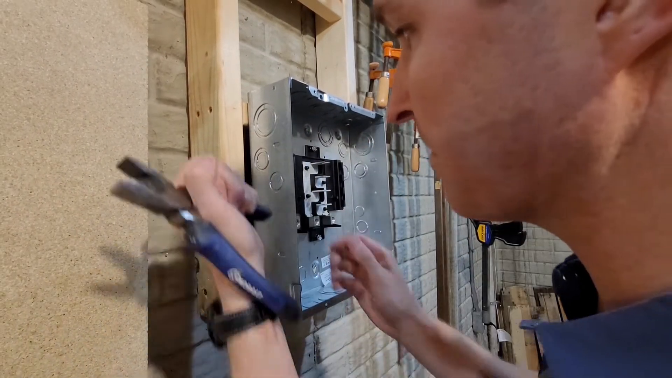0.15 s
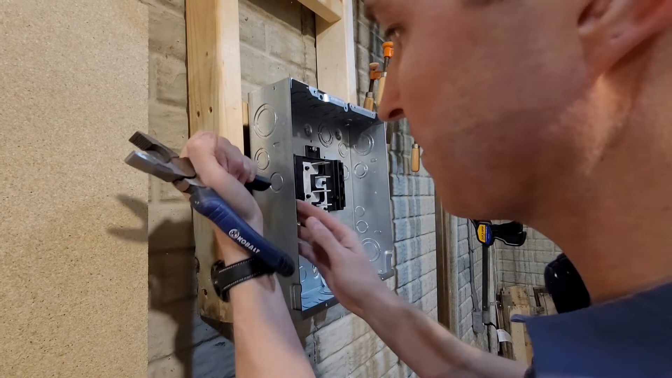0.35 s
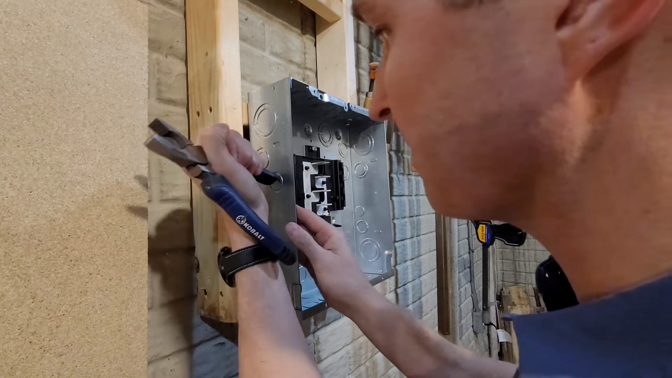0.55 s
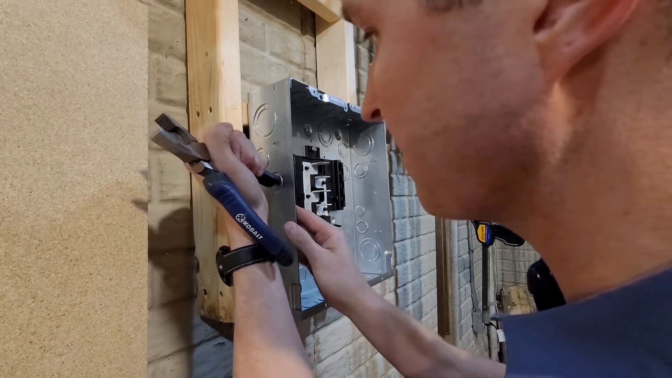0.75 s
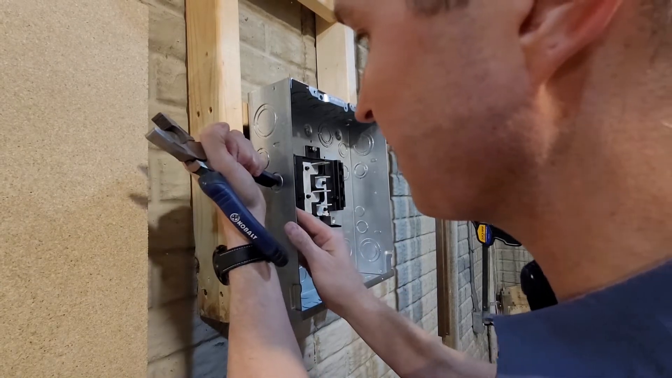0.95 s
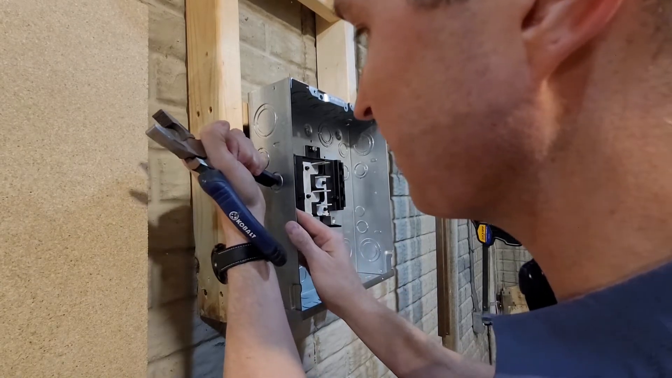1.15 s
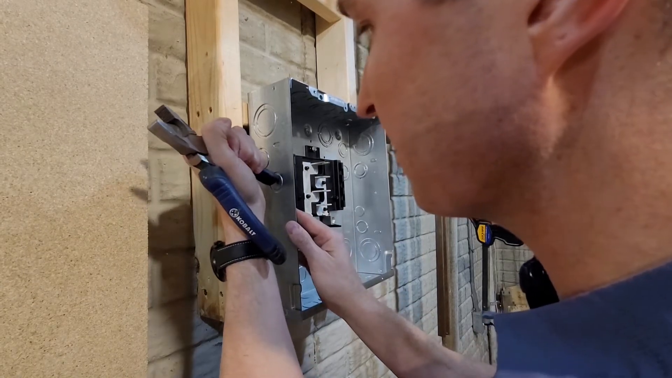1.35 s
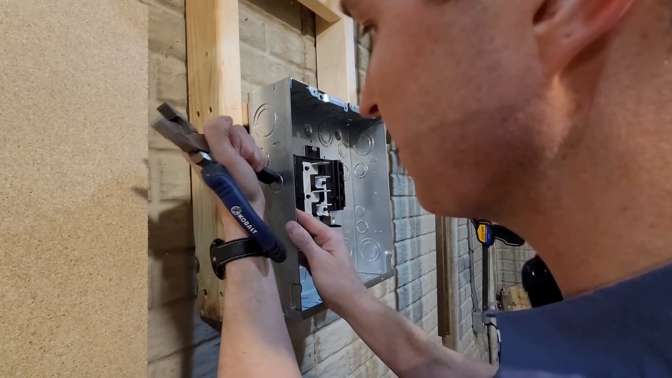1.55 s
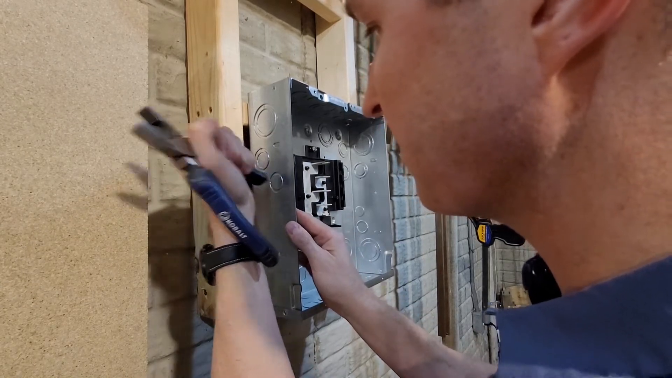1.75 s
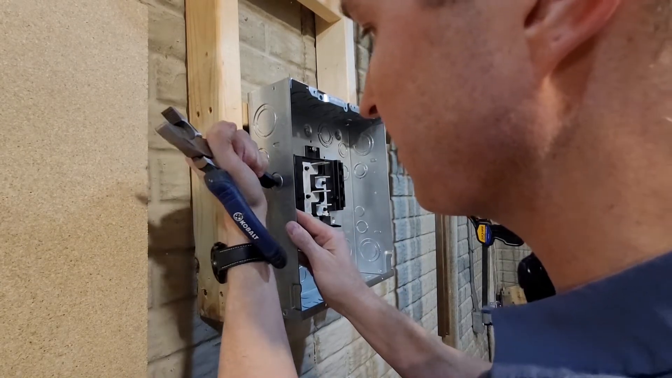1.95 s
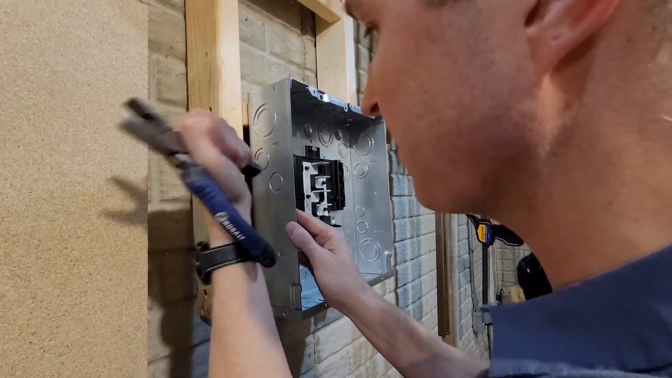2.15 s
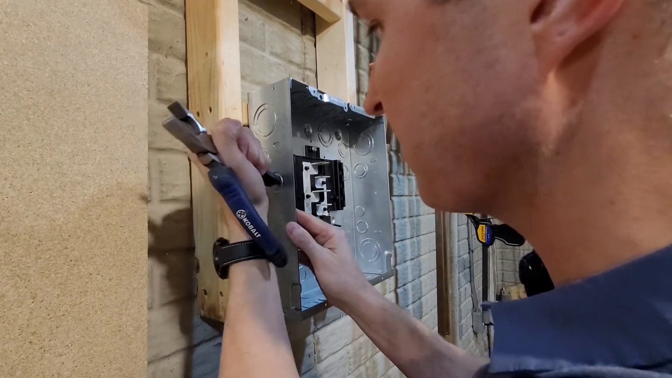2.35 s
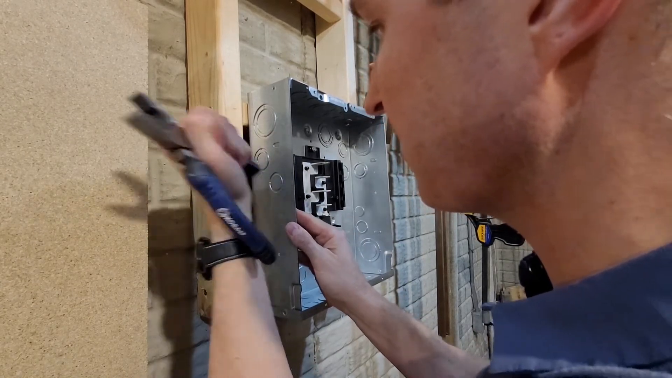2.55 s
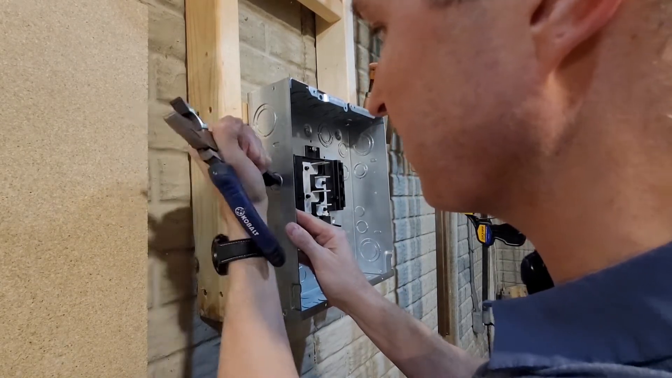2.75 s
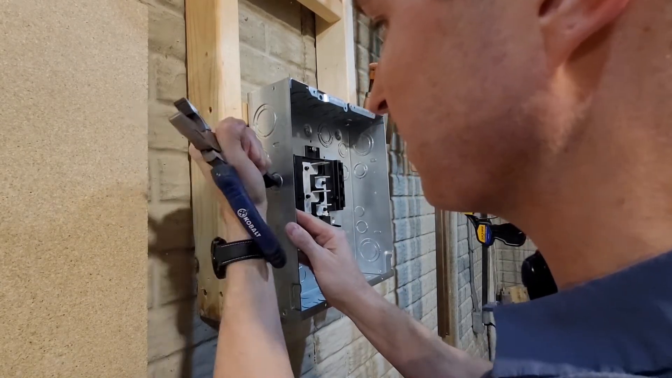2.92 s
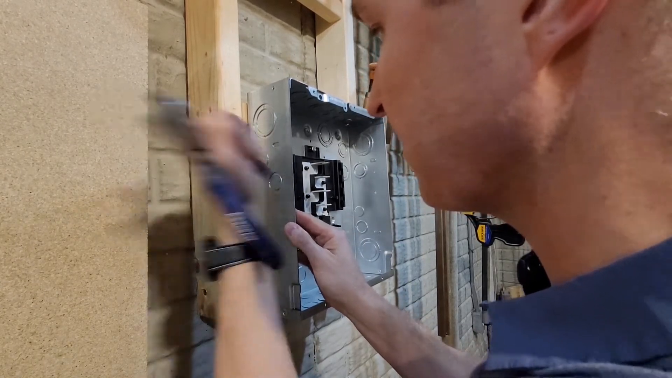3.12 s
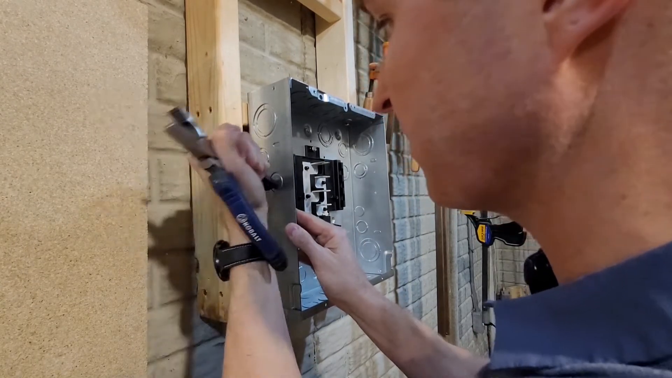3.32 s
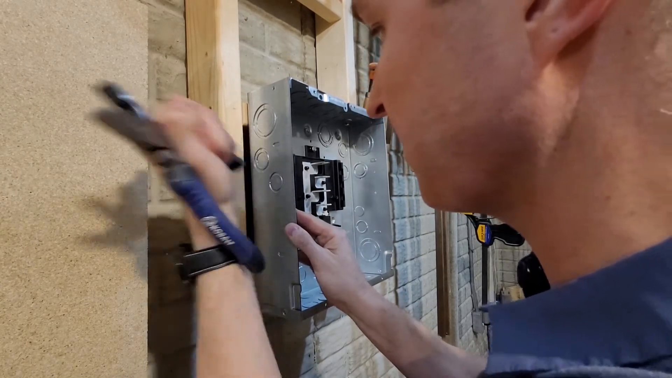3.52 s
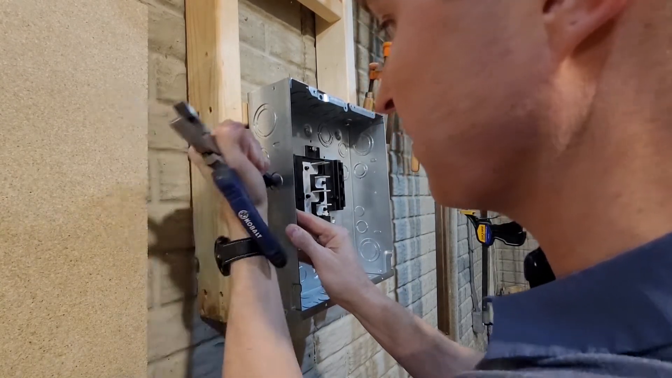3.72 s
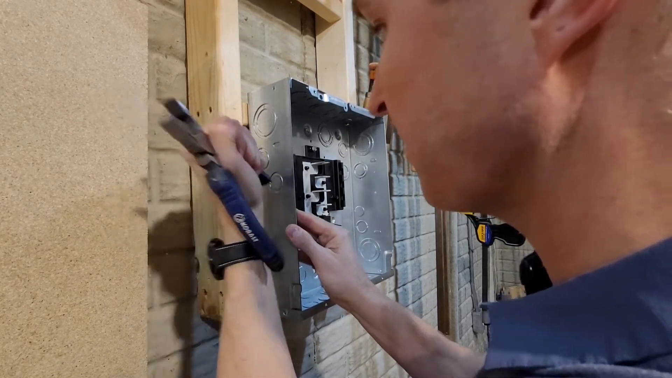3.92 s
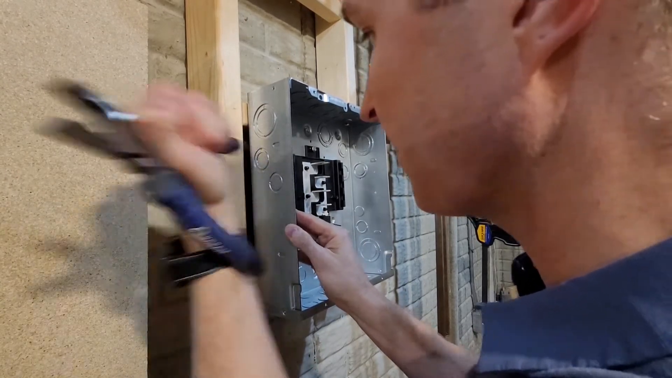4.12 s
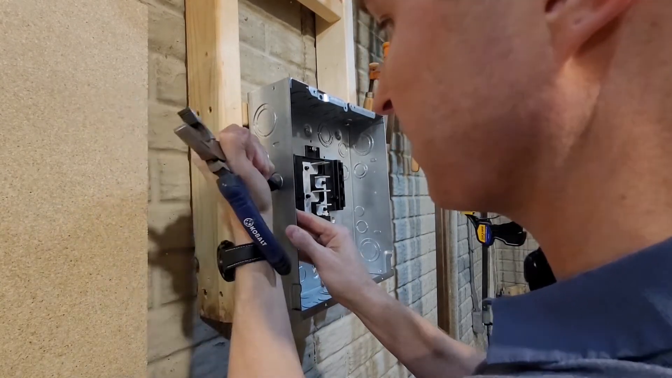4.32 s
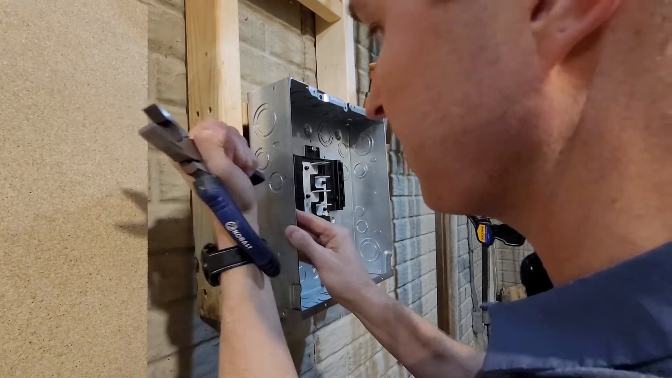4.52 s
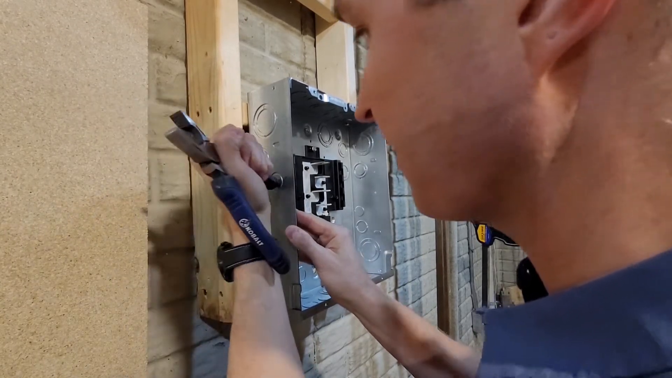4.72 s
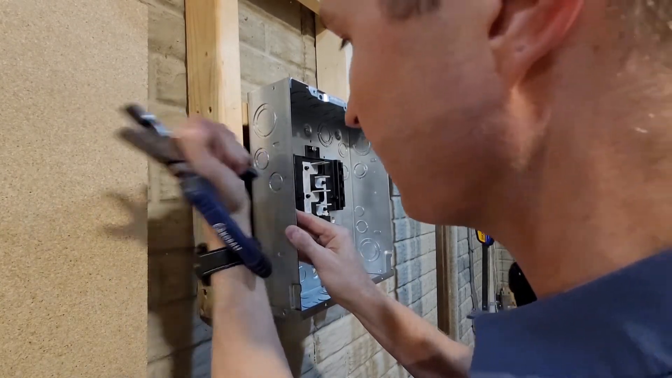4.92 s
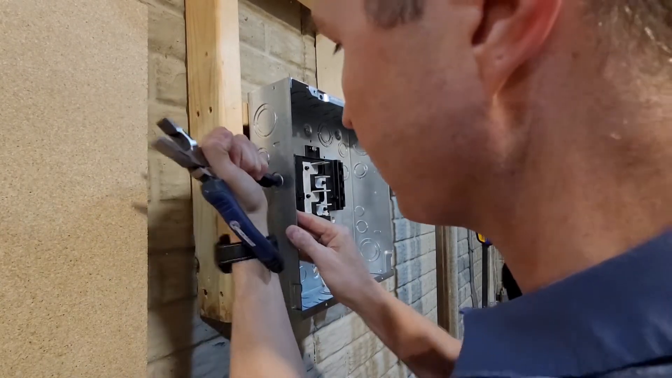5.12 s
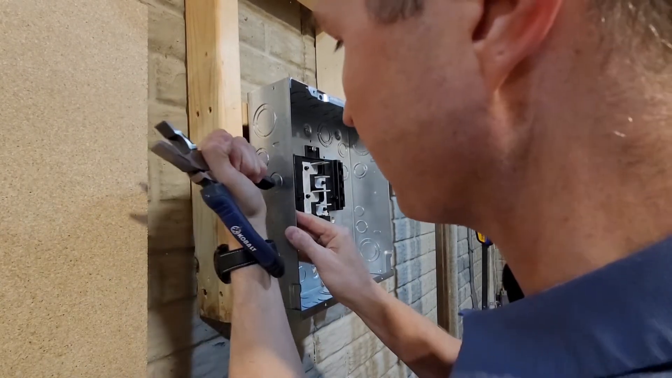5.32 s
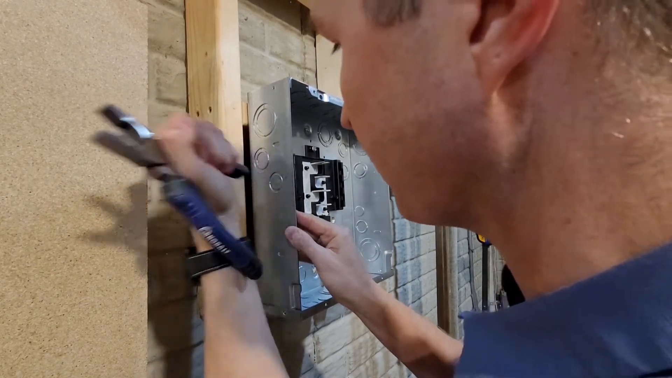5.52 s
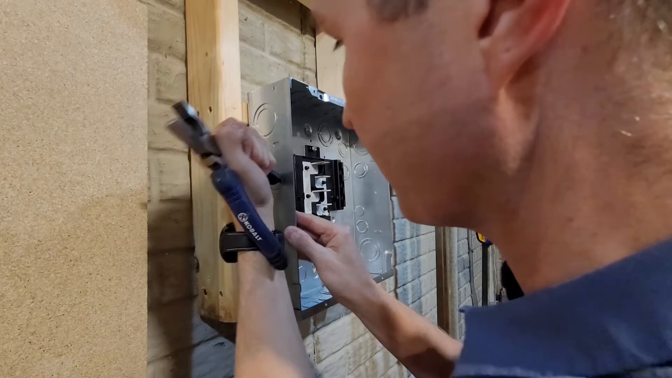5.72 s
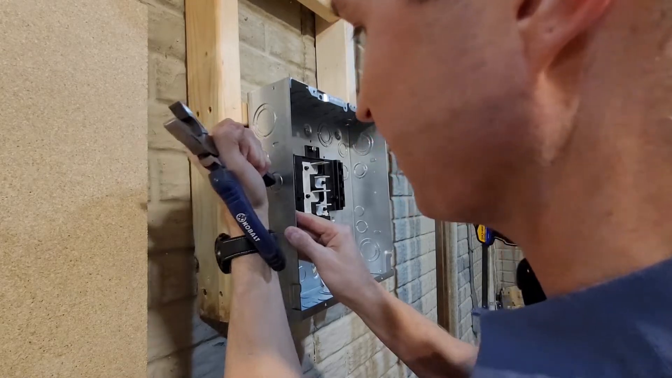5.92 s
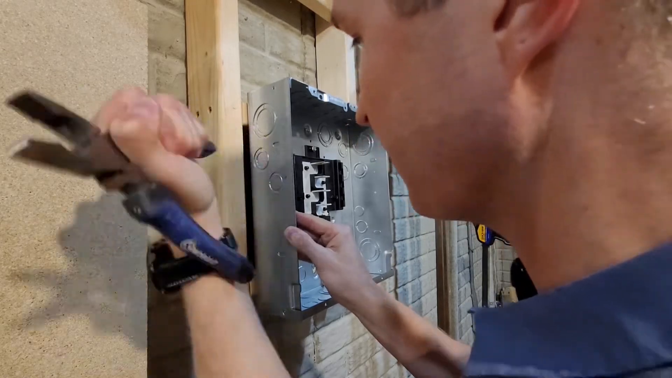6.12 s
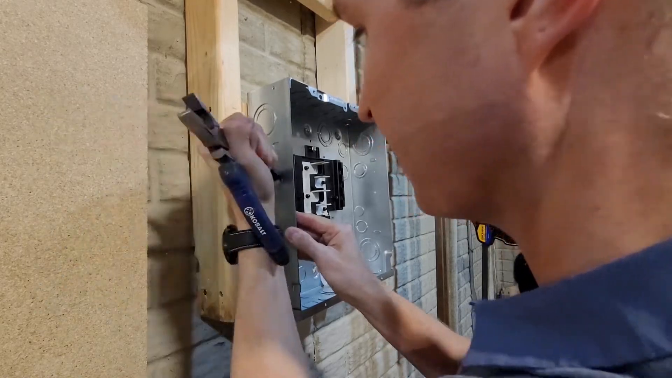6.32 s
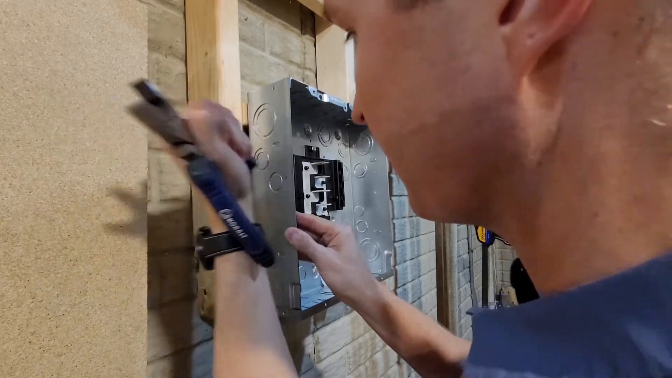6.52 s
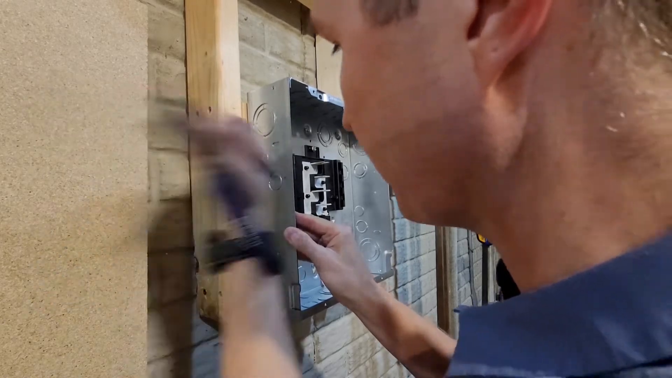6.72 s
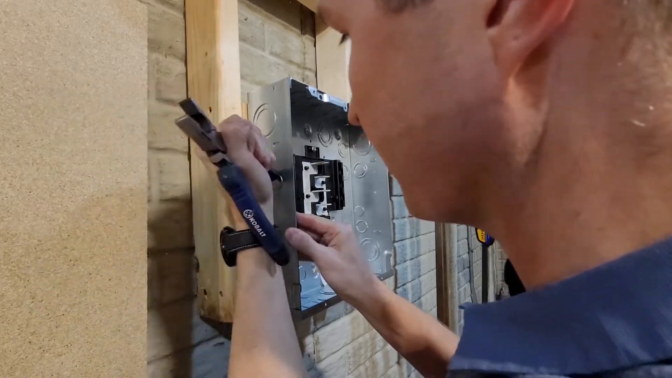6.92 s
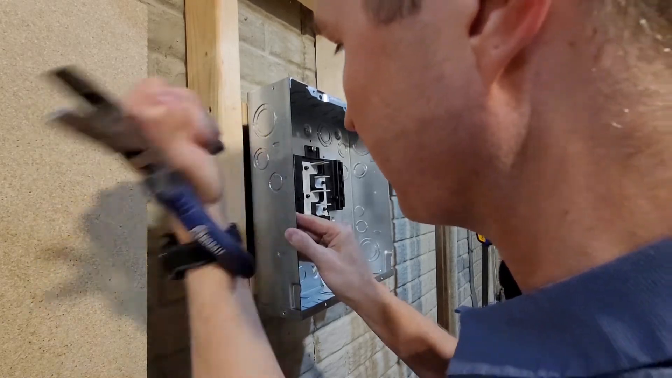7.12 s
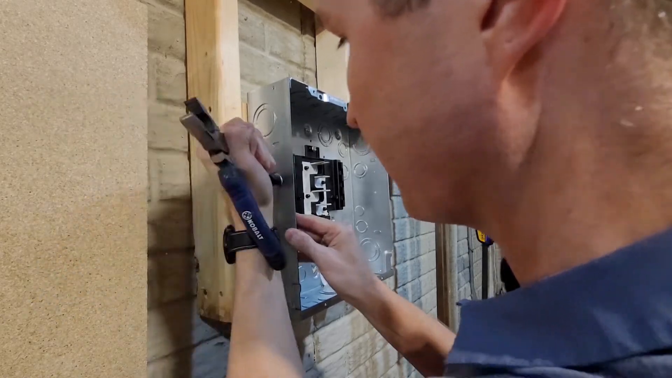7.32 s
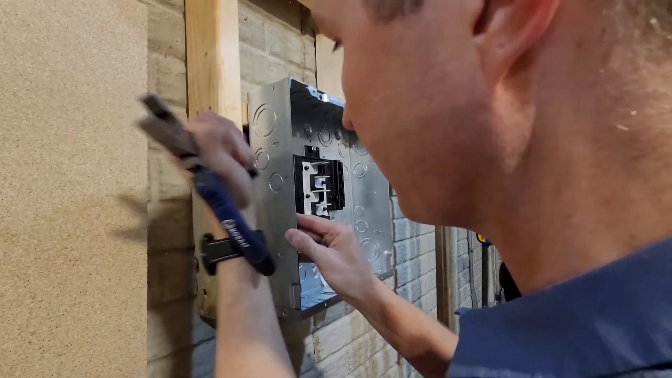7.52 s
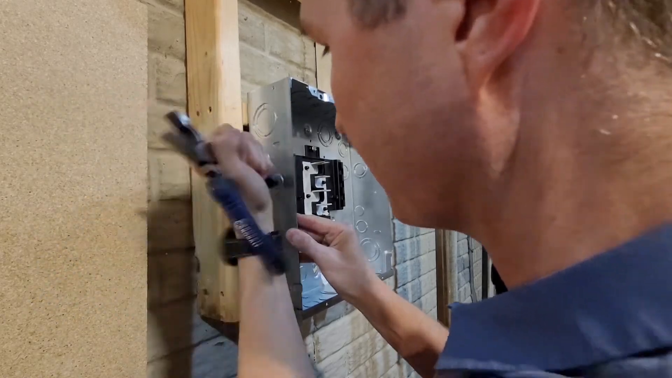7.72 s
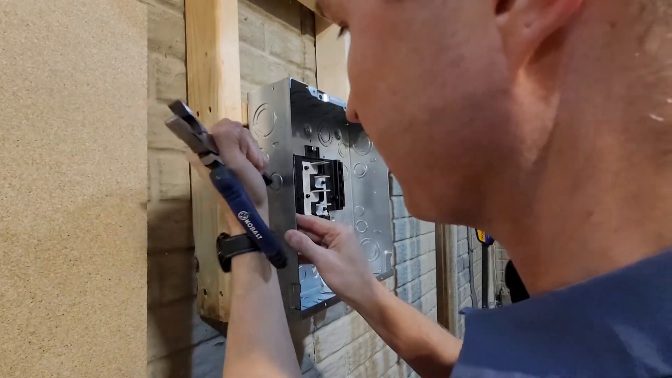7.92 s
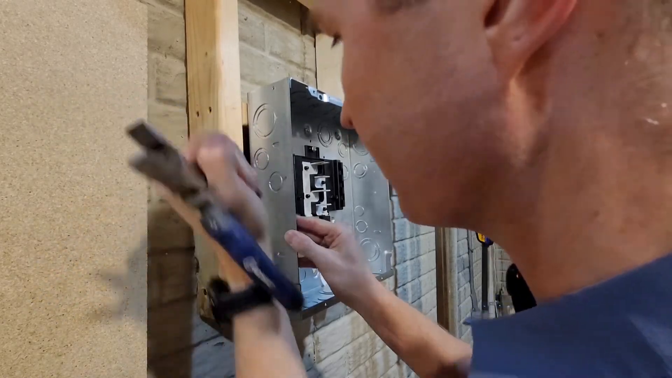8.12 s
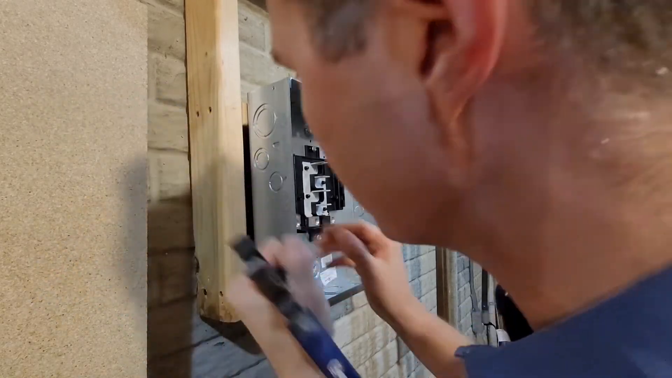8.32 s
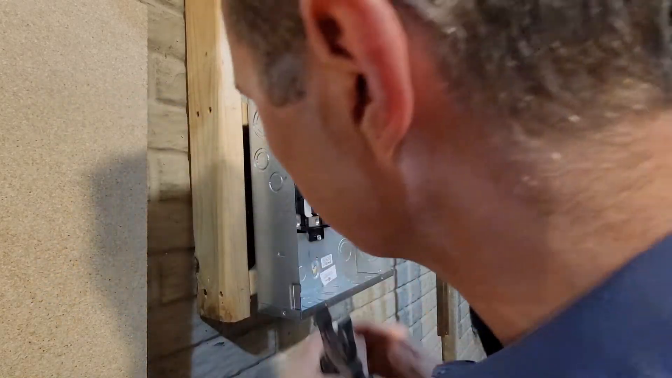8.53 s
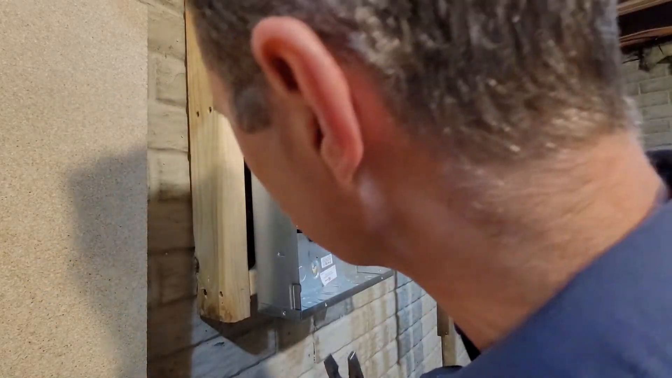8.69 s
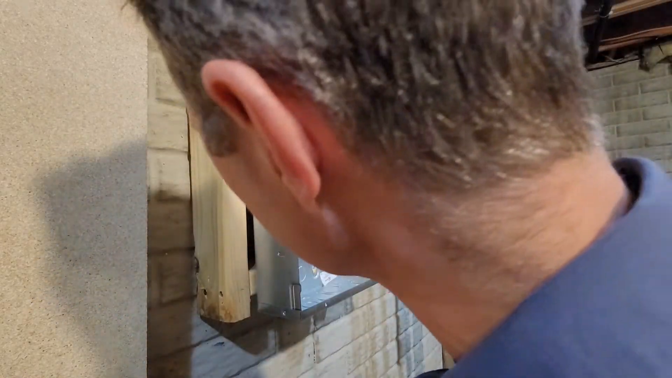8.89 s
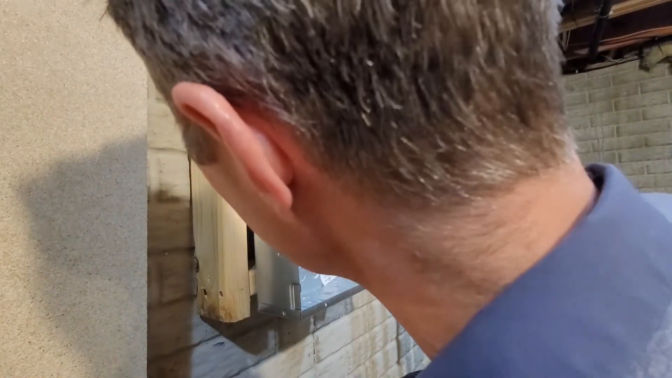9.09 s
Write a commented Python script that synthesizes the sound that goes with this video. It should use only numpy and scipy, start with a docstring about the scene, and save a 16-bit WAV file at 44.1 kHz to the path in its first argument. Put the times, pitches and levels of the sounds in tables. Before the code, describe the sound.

A close, stereo indoor scene in a basement with a quiet, steady low rumble. From 0 to 2 s a sleeve rustles, with small grip ticks and scuffs; a barely audible tap falls at 0.5 s, a dull soft one at 0.65, and two more at 1.6 and 1.7. Hard blows of pliers on a steel electrical box begin at 1.9 s, then 2.3, 2.7, 3.2, 3.7 and 4.2: a sharp crack, damped clank, dense steel clatter and hollow box ring, dying within about a third of a second over a faint framing boom. A weak dull tap comes at 4.8. Brighter hard blows follow at 5.1, 5.7, 6.2, 6.8, 7.3 and 7.7, loud enough to squash the peaks. A faint bright hiss grows from about 7 s. After the last ring fades, clothing rustles around 8.3 to 9.4 s, leaving rumble and hiss.

```python
"""The side of a pair of pliers hammers on the knockout of a steel electrical box screwed to a stud in a basement.
Five light taps and twelve hard blows: damped wall partials, crack, dense steel clatter, box modes, echoes, boom.
Shaped noise makes the sleeve rustle, grip ticks and scuffs around the blows.
Below lies a steady low noise rumble; a bright noise hiss swells near the end."""
import sys
import numpy as np
from scipy import signal
from scipy.fft import rfft, irfft, next_fast_len
from scipy.io import wavfile
from scipy.ndimage import uniform_filter1d, minimum_filter1d, map_coordinates

SR = 44100
rng = np.random.default_rng(int(sys.argv[2]) if len(sys.argv) > 2 else 0)


def wav_record(signal):
    """Record a signal, one row per channel, as 16-bit PCM in the file named by sys.argv[1]."""
    frames = np.transpose(np.atleast_2d(signal))
    bounded = np.clip(frames, -1, 1)
    # unit amplitude maps onto the largest positive 16-bit level
    quanta = np.round(bounded * 32767).astype(np.int16)
    wavfile.write(sys.argv[1], SR, quanta)


N = 408132
TIME_S = np.arange(N) / SR
RING_S = np.arange(SR) / SR  # time since a blow


def amp(db):
    """Decibels to gain."""
    return 10 ** (np.asarray(db) / 20)


def unit(x):
    """Scale to rms 1."""
    return x / np.sqrt(np.mean(x ** 2) + 1e-20)


def along(points, hz):
    """Interpolate (frequency, value) points on a log-frequency axis."""
    point_hz, value = np.transpose(points)
    return np.interp(np.log(hz + 1), np.log(point_hz + 1), value)


def wobble(knots_per_s):
    """Smooth random curve through normally distributed knots."""
    knots = rng.standard_normal(int(N * knots_per_s / SR) + 4)
    return map_coordinates(knots, [np.arange(N) * knots_per_s / SR])


def filtered(x, response):
    """Apply a gain given as a function of frequency."""
    size = x.shape[-1]
    padded = next_fast_len(size + 4096)
    spectrum = rfft(x, padded) * response(np.fft.rfftfreq(padded, 1 / SR))
    return irfft(spectrum, padded)[..., :size]


# Stereo width: (frequency [Hz], side re mid [dB])
SIDE_TO_MID = [(60, -16), (130, -14.5), (260, -6.5), (500, 2.5), (12000, -0.5)]


def noise(spectrum, size):
    """Stereo noise of rms 1: alike in the bass, nearly unrelated in the treble."""
    def mid_side_gain(hz):
        return amp(along(spectrum, hz)) * amp([0 * hz, along(SIDE_TO_MID, hz)])

    mid, side = filtered(rng.standard_normal((2, size)), mid_side_gain)
    return unit(np.array([mid + side, mid - side]))


def add(track, start_s, sound):
    """Mix a sound into the track in place."""
    part = track[:, max(round(start_s * SR), 0):][:, :sound.shape[-1]]
    part += sound[:, :part.shape[-1]]


def swell(t, rise_s, t60_s):
    """Exponential build-up times exponential decay."""
    return (1 - np.exp(-t / rise_s)) * amp(-60 * t / t60_s)


# Room rumble spectrum: (frequency [Hz], relative density [dB per Hz])
RUMBLE_SPECTRUM = [(20, -28.5), (45, -22), (75, 0.5), (110, -17), (160, -19.5), (230, -15), (500, -20),
                   (1000, -27.5), (5000, -35), (9000, -46), (16000, -48)]


def rumble(level_db):
    """Steady noise, strongest in the low bass."""
    return amp(level_db) * noise(RUMBLE_SPECTRUM, N)


# Rustle of larger movements, lining up and turning away: (start [s], length [s], level [dB])
MOVES = [(0, 2.29, -55), (8.6, 0.54, -53.5)]
MOVE_FADE_S = 0.29  # outside each movement's span
SWING_LEAD_S, SWING_WIDTH_S, SWING_DB = 0.1, 0.08, -71.5  # brush before each blow; dB adds to its force
ARM_DB, ARM_WAVER_DB = -69.5, 0.5  # constant slight motion, uneven rubbing


def arm_motion():
    """Rustle gain: a constant floor, larger movements, and swings that follow each blow's force."""
    moves = 0
    for start_s, length_s, db in MOVES:
        inside_s = np.minimum(TIME_S - start_s, start_s + length_s - TIME_S)
        moves = moves + amp(db) * np.clip(1 + inside_s / MOVE_FADE_S, 0, 1)
    swings = 0
    for blow_s, force_db, *_ in STRIKES:
        offset = (TIME_S - blow_s + SWING_LEAD_S) / SWING_WIDTH_S
        swings = swings + amp(SWING_DB + force_db) * np.exp(-offset ** 2)
    waver = amp(ARM_WAVER_DB * wobble(knots_per_s=14))
    return np.maximum(moves, (amp(ARM_DB) + swings) * waver)


def patchy(x, depth_db):
    """Random gain patches, some 700 Hz wide and 50 ms long."""
    z = signal.stft(x, nperseg=512)[2]
    field = rng.standard_normal(z.shape[1:])
    field = uniform_filter1d(field, size=8, axis=0)
    field = uniform_filter1d(field, size=9, axis=1)
    patched = signal.istft(z * amp(depth_db * unit(field)), nperseg=512)[1]
    return unit(patched[:, :N])


# Rubbing cloth spectrum: (frequency [Hz], relative density [dB per Hz])
CLOTH_SPECTRUM = [(300, -9.5), (900, -10), (1400, -1), (2800, -4.5), (5500, -11.5), (8000, -26.5),
                  (16000, -32.5)]


def sleeves():
    """Cloth friction: patchy noise driven by the arm's motion."""
    return arm_motion() * patchy(noise(CLOTH_SPECTRUM, N), depth_db=3.2)


# Pliers ticking in the hand: (time [s], relative level [dB])
GRIP_TICKS = [(0.0713, -50.5), (0.29, -53.5), (0.994, -52), (1.4225, -56), (1.79, -59), (2.6188, -51.5),
              (4.4742, -59), (5.6181, -65.5)]


def grip_ticks(level_db):
    """Small contacts: sharp-onset, decaying treble noise."""
    out = np.zeros((2, N))
    t = RING_S[:SR // 4]
    for start_s, db in GRIP_TICKS:
        tick = noise([(1500, -29), (6000, 5.0), (15000, -15)], len(t))
        add(out, start_s, amp(db + level_db) * tick * swell(t, rise_s=0.00069, t60_s=0.2))
    return out


# Short scuffs of cloth and skin: (time [s], centre frequency [Hz], level [dB])
SCUFFS = [(0.128, 2800, -51.5), (0.191, 3130, -47.5), (.34, 4070, -54), (0.36, 2170, -57),
          (0.931, 1800, -53), (1.179, 2450, -48.5), (1.38, 1860, -49), (1.388, 3780, -49),
          (4.047, 4300, -60), (4.14, 3030, -57), (4.66, 2500, -56), (4.658, 1500, -61), (4.879, 3330, -61),
          (5.42, 2320, -58.5), (5.619, 1600, -56), (7.16, 2180, -57.5)]


def scuffs():
    """Brief friction strokes: band noise under a bell-shaped envelope."""
    out = np.zeros((2, N))
    stroke = np.hanning(SR // 14)
    for start_s, hz, db in SCUFFS:
        band = [(hz / 2, -35), (hz / 1.4, -7), (hz, 0), (hz * 1.26, -7), (hz * 2, -35)]
        add(out, start_s, amp(db) * stroke * noise(band, len(stroke)))
    return out


# Struck box wall, damped by the pliers: (frequency [Hz], relative level [dB], t60 [s])
WALL_PARTIALS = [(360.4, -18, 0.082), (731, -20.5, 0.25), (876, -15.5, 0.098), (1060, -5.5, 0.03),
                 (1120, -12, 0.1), (1208, -2, 0.038), (1720, -27, 0.018), (2456, -13.5, 0.16)]
# Steel meeting steel: (frequency [Hz], relative density [dB per Hz])
CRACK_SPECTRUM = [(500, -20.5), (1500, 5.5), (2700, 7), (6000, -21.5), (15000, -13.5)]


def clang(lag_s, scatter_db, crack_db):
    """Noise crack plus damped wall partials, later in the right channel."""
    t = np.maximum(RING_S[:SR // 4] - np.array([[0], [lag_s]]), 0)
    wall = 0
    for hz, db, t60_s in WALL_PARTIALS:
        level = amp(db + scatter_db * rng.normal())
        wall = wall + level * np.sin(2 * np.pi * hz * t) * swell(t, 0.00069, t60_s)
    crack = amp(crack_db) * noise(CRACK_SPECTRUM, t.shape[1]) * swell(t, 0.00024, 0.022)
    return wall + crack


# Dense steel ring in the room: (frequency [Hz], relative density [dB per Hz])
CLATTER_SPECTRUM = [(30, -0.5), (90, 4.5), (180, 2), (240, 6.5), (850, -0.5), (1280, -4.5), (1450, -6.5),
                    (2400, -6.5), (3500, -15), (6300, -12.5), (7600, -19.5), (11700, -16.5), (13700, -25.5),
                    (15600, -27)]
# Ring build-up: (frequency [Hz], rise [s])
RING_RISE = [(60, 0.053), (300, 0.0013), (1100, 0.0096), (2500, 0.003), (5000, 0.013), (12000, 0.0088)]
# Ring decay: (frequency [Hz], t60 [s])
RING_DECAY = [(60, 0.44), (300, 0.33), (800, 0.31), (2000, 0.28), (5000, 0.23), (12000, 0.18)]


def clatter(ripple_db):
    """Dense steel modes and echoes as rippled noise; build-up and decay differ by band."""
    def ripple(hz):
        knots_hz = np.linspace(0, SR / 2, len(ripple_db))
        return amp(np.interp(hz, knots_hz, ripple_db) * (hz > 1300))

    bunched = filtered(noise(CLATTER_SPECTRUM, len(RING_S)), ripple)
    hz, t, z = signal.stft(bunched, SR, nperseg=256)
    shape = swell(t, along(RING_RISE, hz)[:, None], along(RING_DECAY, hz)[:, None])
    return signal.istft(z * shape, SR, nperseg=256)[1][:, :len(RING_S)]


# Resonances of box, stud and room: (frequency [Hz], relative level before tilt [dB])
BOX_MODES = [(70, -25), (121, -23), (151, -26), (201, -23), (230, -27), (256, -24), (289, -25), (326, -24),
             (405, -21), (462, -23), (495, -20), (525, -20), (568, -28), (598, -24), (642, -27), (685, -29),
             (719, -24), (778, -23), (828, -27), (883, -21), (914, -26), (978, -27), (1035, -28),
             (1188, -26), (1483, -32), (1911, -33), (2153, -37), (2327, -36), (2527, -40), (2665, -42)]


def box_modes(linger, tilt_db_per_octave):
    """Lasting modal sines; channel phases differ more at short wavelengths."""
    hz, db = np.transpose(BOX_MODES)[:, :, None, None]
    spread = np.arctan(amp(along(SIDE_TO_MID, hz)))
    apart = spread * rng.choice([-1, 1], hz.shape) * np.array([[1], [-1]])
    phase = rng.uniform(0, 2 * np.pi, hz.shape) + apart
    level = amp(db + tilt_db_per_octave * np.log2(hz / np.median(hz)))
    envelope = swell(RING_S, along(RING_RISE, hz), linger * along(RING_DECAY, hz))
    return level * np.sin(2 * np.pi * hz * RING_S + phase) * envelope


# Framing boom: (frequency [Hz], relative density [dB per Hz])
BOOM_SPECTRUM = [(25, 4), (70, -1.5), (140, 7.5), (175, -7), (280, 1.5), (480, -15.5), (900, -32.5),
                 (2000, -34), (5000, -84)]


def framing_boom(level_db):
    """Long bass ring of the framing: slowly decaying noise."""
    return amp(level_db) * noise(BOOM_SPECTRUM, len(RING_S)) * swell(RING_S, 0.019, 1.616)


# Near-wall treble reflections: (delay [s], relative level [dB])
WALL_REFLECTIONS = [(0.0091, -15), (0.0096, -17), (0.0177, -12)]


def wall_echoes(t60_s):
    """Crack returning off near walls as delayed treble noise bursts."""
    out = np.zeros((2, len(RING_S)))
    t = RING_S[:SR // 20]
    for delay_s, db in WALL_REFLECTIONS:
        burst = noise([(1500, -17.5), (5000, -1.5), (11500, -4.5), (15500, -2.5)], len(t))
        add(out, delay_s, amp(db) * burst * swell(t, 0.00016, t60_s))
    return out


# Usual hard contact: (frequency [Hz], gain [dB])
CONTACT_COLOUR = [(220, -0.68), (400, 0.5), (850, -2.03), (1150, -1.4), (1600, 0.5), (2500, -3), (3700, 0),
                  (11000, -3)]
# Brightness weight, mostly rising with frequency: (frequency [Hz], share [1])
BRIGHTNESS_SHARE = [(850, 0.014), (1150, 0.15), (1600, 0.11), (2600, 0.26), (11000, 0.99)]
# Bass thud weight: (frequency [Hz], share [1])
THUD_SHARE = [(100, 1), (400, 0)]
# Hollowness weight, trading the wall's clang for its lower knock: (frequency [Hz], share [1])
HOLLOW_SHARE = [(400, 0.14), (850, 0.81), (1150, -0.44), (3000, 0.55)]


def contact(hz, bright_db, thud_db, hollow_db):
    """Gain over frequency set by how pliers meet box."""
    colour_db = along(CONTACT_COLOUR, hz)
    colour_db = colour_db + bright_db * along(BRIGHTNESS_SHARE, hz)
    colour_db = colour_db + thud_db * along(THUD_SHARE, hz)
    return amp(colour_db + hollow_db * along(HOLLOW_SHARE, hz))


# Pliers on box; square contact bright, glancing dull; the last three are weighted by the shares above:
# (time [s], force [dB], brightness [dB], stud thud [dB], hollowness [dB])
STRIKES = [(0.466, -43, -12, -1, 6), (0.6409, -18, -33.5, -7.5, 4.5), (1.58, -17.5, -28.5, -8.5, 3.5),
           (1.6792, -30, -46, -3, 5), (1.9122, -1, -11, -3.5, -1), (2.2885, -0.5, -3, -2, 3),
           (2.7307, -0.5, -1.5, -2, 1), (3.1924, -1.7, 4, -1.5, 0.5), (3.68, -1.5, 5.5, 0, 0.5),
           (4.2239, -4, -1, -3, 5.5), (4.7725, -22, -43, -2.5, 2), (5.107, 0.4, 4, -4, 1),
           (5.7238, -2.5, 2, -2.5, 1), (6.248, -1.5, 3, -4.5, 0), (6.7864, 0, 4.5, -4.5, 0),
           (7.279, -1.5, 4, -2, 0), (7.744, -1.5, 4.5, -2.5, .5)]
RIPPLE_DB, RIPPLE_SHIFT_DB = 3, 2  # mode bunching, change per blow


def hammering(clatter_db, box_db, plate_db, boom_db, scatter_db):
    """Blows near one spot share much of their ring; each contact colours it anew."""
    out = np.zeros((2, N))
    ripple_db = RIPPLE_DB * rng.standard_normal(size=400)
    shared = clatter(ripple_db)
    modes = box_modes(linger=1.086, tilt_db_per_octave=-2.5)
    for start_s, force_db, *touch in STRIKES:
        own = clatter(ripple_db + RIPPLE_SHIFT_DB * rng.standard_normal(len(ripple_db)))
        blow = amp(clatter_db) * (shared + own) / np.sqrt(2)
        mode_gains = amp(box_db + scatter_db * rng.standard_normal(len(BOX_MODES)))
        blow += np.tensordot(mode_gains, modes, 1)
        blow += wall_echoes(t60_s=0.032)
        add(blow, 0, amp(plate_db) * clang(lag_s=0.00022, scatter_db=2.0, crack_db=-7.5))
        blow += framing_boom(boom_db)
        add(out, start_s, amp(force_db) * filtered(blow, lambda hz: contact(hz, *touch)))
    return out


# Hiss spectrum: (frequency [Hz], relative density [dB per Hz])
HISS_SPECTRUM = [(800, -19), (1500, -6.5), (2500, -3), (4500, 2.5), (5700, 0.5), (6450, 5), (7900, -4),
                 (9800, -4), (11500, -1), (15600, -5.5)]
HISS_START_S, HISS_RISE_S, HISS_DB = 7.084, 1, -44.5  # rise is a time constant toward HISS_DB


def hiss():
    """Bright noise rising exponentially toward its full level."""
    since_s = np.maximum(TIME_S - HISS_START_S, 0)
    return amp(HISS_DB) * (1 - np.exp(-since_s / HISS_RISE_S)) * noise(HISS_SPECTRUM, N)


def scene():
    """Sum of rumble, handling, blows and hiss."""
    handling = sleeves() + grip_ticks(level_db=-0.5) + scuffs()
    blows = hammering(clatter_db=-5, box_db=1.5, plate_db=6.0, boom_db=-32.0, scatter_db=2.5)
    return rumble(level_db=-55.5) + handling + blows + hiss()


def limiter(x, ceiling_db, release_db_per_s):
    """Duck just ahead of each peak, then recover at a constant dB rate."""
    over_db = np.maximum(20 * np.log10(np.abs(x).max(0) + 1e-9) - ceiling_db, 0)
    recovery_db = release_db_per_s * TIME_S
    held_db = np.maximum.accumulate(over_db + recovery_db) - recovery_db
    return x * uniform_filter1d(minimum_filter1d(amp(-held_db), size=65), size=65)


TOP_HZ = 15750


def record(dry):
    """Limit hard blows, round off peaks, then cut the extreme treble."""
    held = limiter(dry, ceiling_db=3.5, release_db_per_s=76)
    rounded = held / (1 + np.abs(held) ** 4) ** (1 / 4)
    return filtered(rounded, lambda hz: np.interp(hz, [TOP_HZ - 150, TOP_HZ + 50], [1, 0]))


dry = scene()
out = record(dry)
wav_record(out)
```